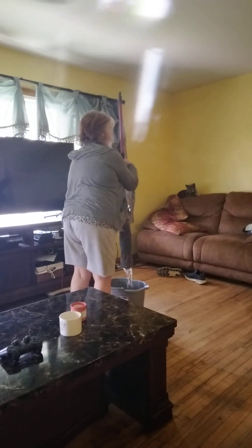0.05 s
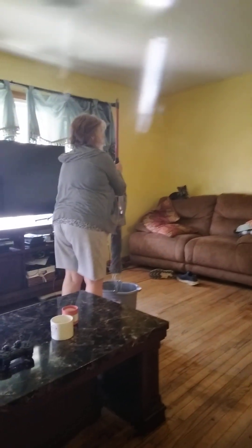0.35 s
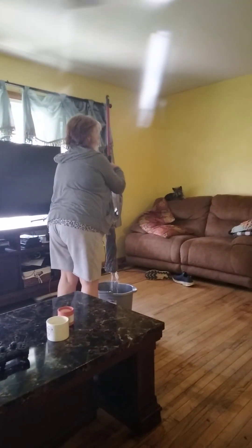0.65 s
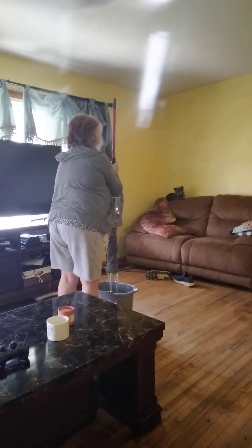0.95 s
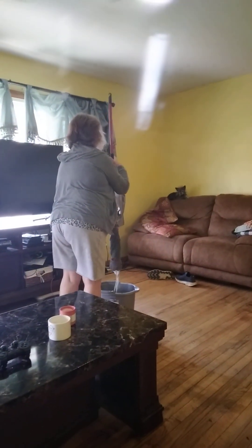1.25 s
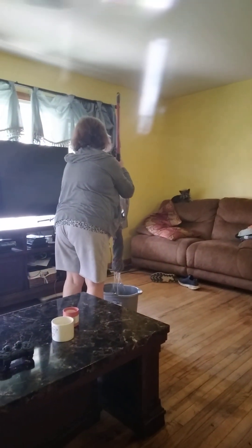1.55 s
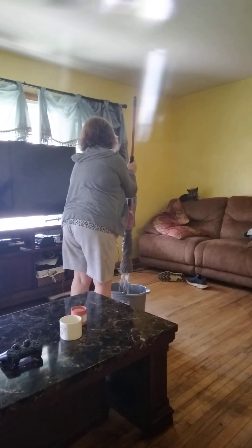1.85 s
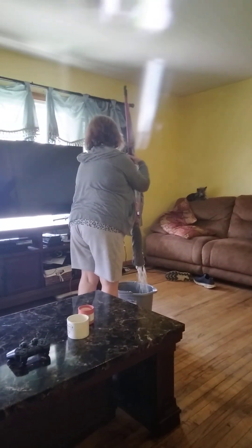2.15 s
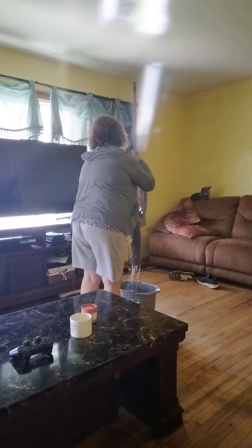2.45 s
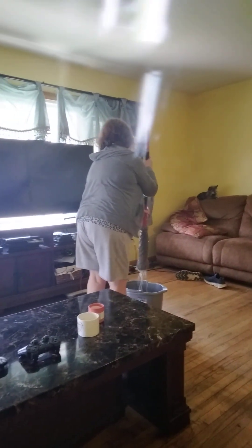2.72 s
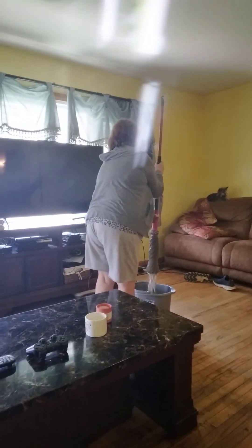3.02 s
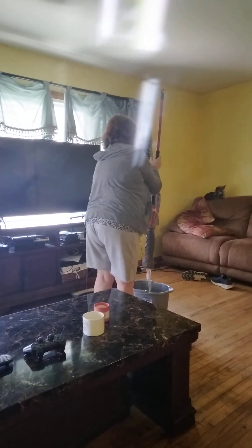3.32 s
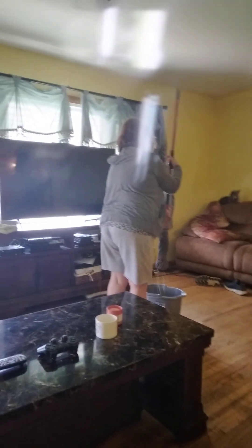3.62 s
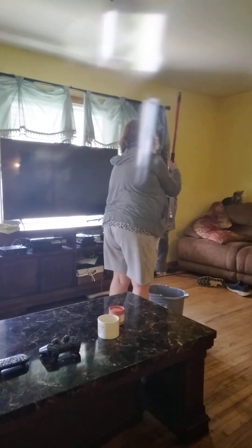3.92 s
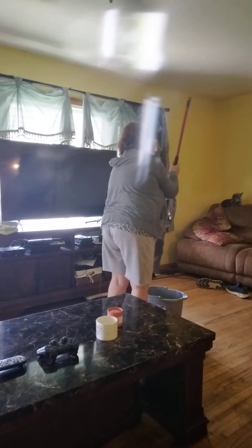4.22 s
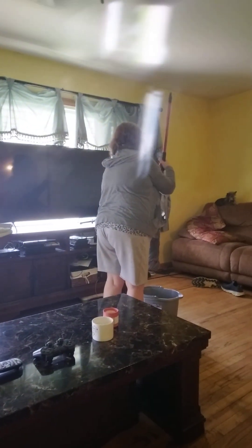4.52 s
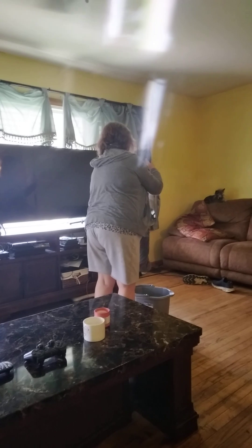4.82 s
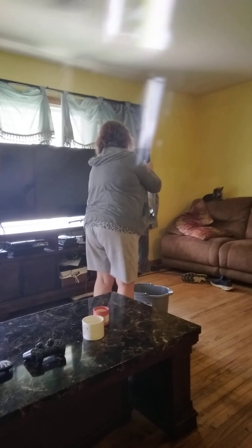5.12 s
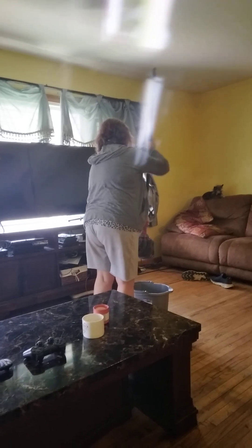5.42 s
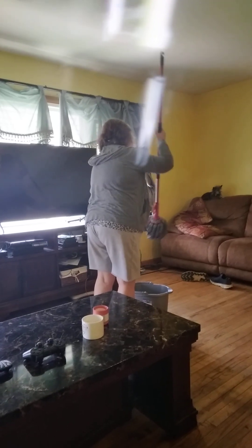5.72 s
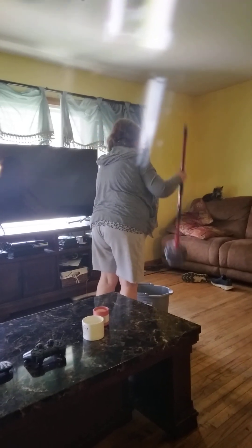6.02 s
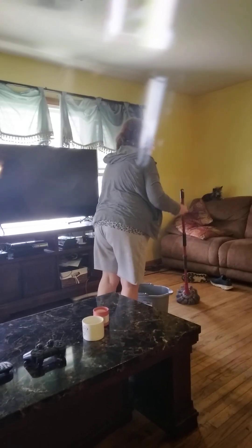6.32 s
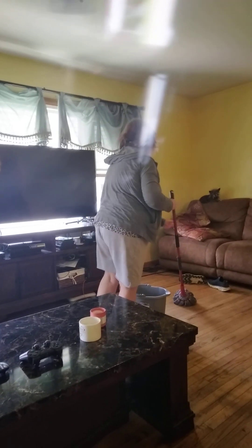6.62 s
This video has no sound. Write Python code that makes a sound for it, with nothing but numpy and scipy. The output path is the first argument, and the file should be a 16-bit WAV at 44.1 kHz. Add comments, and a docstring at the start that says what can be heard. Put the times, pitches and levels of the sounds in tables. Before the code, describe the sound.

A twist mop is wrung over a plastic bucket in a living room, heard from a few metres away with a short room echo. A low appliance hum and a soft rush of air continue throughout. The mop's ratchet turns in eight quick runs of clicks that blur into creaks, at about 0.3, 0.9, 1.6, 2.6, 3.5, 4.0, 4.4 and 4.8 seconds. From the start, water trickles and gushes into the bucket, splashing, drumming hollowly and making small plops. At around 3.8 seconds the flow thins to faint drips, so the last three twists sound nearly dry. The damp strings rustle softly at 5.3 seconds as the mop is lifted, and more faintly near 6 seconds. At about 6.3 seconds the wet head slaps down on the wooden floor, which gives a low thud, leaving the hum until about 7 seconds.

```python
"""A living room, where a twist mop is wrung over a plastic bucket a few metres away.
An appliance hums low throughout. The mop's ratchet clicks in eight quick runs that the room smears
into creaks, and water splashes, drums and plops into the bucket until only drips are left.
Then the damp strings rustle as the mop is lifted, and its head slaps down on the wooden floor,
which answers with a low thud."""
import sys
import numpy as np
from scipy import signal
from scipy.fft import rfft, irfft, next_fast_len
from scipy.io import wavfile
from scipy.ndimage import uniform_filter1d

SR = 44100
rng = np.random.default_rng(int(sys.argv[2]) if len(sys.argv) > 2 else 0)


def to_wav(s):
    """Save 16-bit WAV."""
    ch = np.atleast_2d(s).T  # columns
    pcm = np.round(np.clip(ch, -1, 1) * 32767)  # PCM
    wavfile.write(sys.argv[1], SR, pcm.astype(np.int16))


N = 302516
T = np.arange(N) / SR


def from_db(db):
    """Turn decibels into a gain to multiply by."""
    return 10 ** (np.asarray(db) / 20)


def rms_one(x):
    """Scale a signal to an average power of 1."""
    return x / np.sqrt(np.mean(x ** 2) + 1e-20)


def at_hz(points, hz):
    """Look up a frequency in a table, gliding between rows on a log scale."""
    f, value = np.transpose(points)
    return np.interp(np.log(np.maximum(hz, 1)), np.log(f), value)


def drift(rate):
    """A smooth random wobble that changes about rate times a second."""
    knots = rng.standard_normal(4096)
    zigzag = np.interp(T * rate, np.arange(len(knots)), knots)
    return rms_one(uniform_filter1d(zigzag, int(SR / rate / 2)))


def coloured(x, points, keep_power=True):
    """Give a sound the tone colour in a table, with no echo ahead of it (minimum phase)."""
    size = 4096
    cepstrum = irfft(np.log(from_db(at_hz(points, np.arange(size // 2 + 1) * SR / size))))
    cepstrum[1:size // 2] *= 2
    cepstrum[size // 2 + 1:] = 0
    pulse = irfft(np.exp(rfft(cepstrum)))
    if keep_power:
        pulse = pulse / np.linalg.norm(pulse)
    return signal.oaconvolve(x, pulse.reshape((1,) * (x.ndim - 1) + (-1,)), axes=-1)[..., :N]


def ring(clicks, hz, ring_s):
    """Each click starts a tone that fades by 60 dB in its ring time, ring_s."""
    decay = from_db(-60 / (ring_s * SR))
    step = 2 * np.pi * hz / SR
    return signal.lfilter([0, np.sin(step)], [1, -2 * decay * np.cos(step), decay ** 2], clicks + 1e-18)


def add(out, s, sound):
    """Mix a short sound in at time s."""
    i = max(0, round(s * SR))
    out[..., i:i + sound.shape[-1]] += sound[..., :N - i]


def grains(per_s, spread_db):
    """Tiny random taps of uneven size."""
    sizes = from_db(spread_db * np.minimum(rng.exponential(1, N), 4)) * rng.choice([-1, 1], N)
    return sizes * (rng.random(N) < per_s / SR)


def swell(s, attack_s, hold_s, fade_db_per_s):
    """A gain that rises from time s and starts to die away hold_s after s."""
    return np.clip((T - s) / attack_s, 0, 1) * from_db(-fade_db_per_s * np.maximum(T - s - hold_s, 0))


# The lasting tones of the hum: (pitch [Hz], level [dB], unsteadiness [0-1])
HUM_TONES = [(44.5, -50, 0.26), (92.3, -63.5, .7), (123, -59.5, 0.93), (136.3, -57.5, 1)]
# How two motor tones swell and fade: (time [s], lower tone's level [dB], upper tone's level [dB])
MOTOR_LEVELS = [(0, -51.5, -52.5), (.95, -44.5, -46), (1.85, -49.5, -51.5), (2.2, -57, -59),
                (3.3, -50, -52.5), (4.6, -58, -55), (5.0, -59.5, -82), (6.86, -54, -66)]
def appliance_hum(motor_hz, motor_gain_db, unsteady):
    """An appliance hums on a few low tones while two motor tones come and go."""
    hum = sum(from_db(db) * wavering_tone(hz, shake) for hz, db, shake in HUM_TONES)
    times, *curves = np.transpose(MOTOR_LEVELS)
    for hz, levels in zip(motor_hz, curves):
        hum += from_db(np.interp(T, times, levels) + motor_gain_db) * wavering_tone(hz, unsteady)
    return hum


def wavering_tone(hz, unsteady):
    """One tone of the hum, wandering in loudness and slightly in pitch."""
    wander = 1 + unsteady * (drift(11) + 1j * drift(11))
    return rms_one(np.real(wander * np.exp(2j * np.pi * (hz * T + rng.random()))))


# Tone colour of the room's soft rush: (frequency [Hz], level [dB])
AIR_COLOUR = [(30, -7), (45, -1.5), (70, 6), (125, 6.5), (170, -0.5), (400, -2), (800, -3.5), (1300, -8),
              (2200, -10.5), (4000, -17.5), (6300, -31), (10000, -32.5), (15000, -40)]
def room_air(level_db):
    """A soft, deep rush comes from all around."""
    noise = diffuse_noise(next_fast_len(N))[:, :N]
    return from_db(level_db) * rms_one(coloured(noise, AIR_COLOUR))


# Water the strings let go between twists: (start [s], length [s], splashing [dB], drumming [dB])
WATER_SPURTS = [(-.06, 0.027, -40.5, -59), (.66, 0.078, -45, -48.5), (1.28, 0.22, -54.5, -64),
                (2.1, 0.17, -43.5, -62), (3.02, 0.37, -43, -56), (3.32, 0.26, -45.5, -46)]
def water_flow(trickle_db=(-50.5, -54), dry_from_s=3.8, drying_db_per_s=90, drips_db=-19.5):
    """Two gains, splashing and drumming: a trickle thins to drips; each twist or spurt adds a gush."""
    drying_db = np.maximum(-drying_db_per_s * np.maximum(T - dry_from_s, 0), drips_db)
    power = np.outer(from_db(trickle_db), from_db(drying_db)) ** 2
    for s, length, *_, splash_db, drum_db in [*MOP_TWISTS, *WATER_SPURTS]:
        gush = swell(s, attack_s=0.035, hold_s=length, fade_db_per_s=88.5)
        power += np.outer(from_db([splash_db, drum_db]), gush) ** 2
    return np.sqrt(power)


# Tone colour of spattering water: (frequency [Hz], level [dB])
SPLASH_COLOUR = [(150, -33), (300, 5), (450, -6), (750, -4.5), (1100, -3.5), (1700, -4), (2300, -0.5),
                 (3300, -1), (4300, 0), (6000, -5.5), (8000, -7), (11000, -6), (13000, -10.5), (16000, -18)]
# Notes of the bucket with water in it: (pitch [Hz], level [dB], ring time [s])
BUCKET_NOTES = [(150.5, -7.5, 0.06), (276, -3.5, 0.067), (306.5, 3, 0.083), (382, 0.5, 0.043),
                (444, -3, 0.037), (740, -26.5, 0.036)]
def falling_water(drops_per_s, spread_db, ring_cycles, bubble_db, surge_db, bucket_db):
    """Drops crackle on the water, leave small ringing bubbles and drum on the bucket, in surges."""
    splash_gain, drum_gain = water_flow()
    drops = grains(drops_per_s, spread_db)
    pitches = np.geomspace(500, 9000, 28)   # Hz
    choice = rng.integers(0, 3 * len(pitches), N)   # one drop in three traps air
    bubbles = sum(hz * ring(drops * (choice == k), hz, ring_cycles / hz) for k, hz in enumerate(pitches))
    crackle = rms_one(drops) + from_db(bubble_db) * rms_one(bubbles)
    splash = rms_one(coloured(crackle, SPLASH_COLOUR))
    drum = rms_one(sum(from_db(db) * ring(drops, hz, ring_s) for hz, db, ring_s in BUCKET_NOTES))
    surges = from_db(surge_db * drift(21.715))
    return (splash * splash_gain + from_db(bucket_db) * drum * drum_gain) * surges


# Bigger lumps of water that trap a bubble: (time [s], level [dB], bubble pitch [Hz])
WATER_PLOPS = [(.005, -29, 2270), (.675, -25.5, 3330), (1.188, -30.5, 2140), (1.283, -27.5, 3400),
               (1.325, -28.5, 5140), (1.42, -34.5, 2340), (2.14, -33.5, 810), (2.206, -24.5, 1640),
               (2.225, -25.5, 2420), (2.26, -35.5, 740), (3.03, -23, 3640), (3.153, -22, 2350),
               (3.35, -41, 300), (3.49, -30, 555)]
def plops(ring_cycles, rise, splash_db, splash_s):
    """A lump of water splashes and traps a bubble, whose pitch rises as it floats up."""
    t, tones, splashes = T[:SR // 6], np.zeros(N), np.zeros(N)
    for s, db, hz in WATER_PLOPS:
        age = t * hz / ring_cycles   # 1 when the bubble has faded by 60 dB
        phase = 2 * np.pi * hz * t * (1 + rise * np.minimum(age, 2))
        add(tones, s, from_db(db - 60 * age) * np.sin(phase))
        add(splashes, s, from_db(db + splash_db) * rng.standard_normal(len(t)) * np.exp(-t / splash_s))
    return tones + coloured(splashes, SPLASH_COLOUR)


# Each twist of the mop's sleeve drags a catch over a run of teeth and squeezes out water:
# (start [s], length [s], teeth [count], speeding up [-1 to 1], first tooth [dB], middle tooth [dB],
#  last tooth [dB], first treble [dB], last treble [dB], hollow knock [dB], splashing [dB], drumming [dB])
MOP_TWISTS = [ (.314, 0.16, 8, 0, -14.5, -10.5, -22, -6, -2, 0.5, -58, -51),
              (0.899, 0.18, 8, -0.024, -17, -16, -19.5, -32, -7, -2, -41, -45),
              (1.644, 0.23, 7, 0.1, -15, -16, -11.5, -10, 2, -18, -35.5, -41.5),
              (2.625, 0.26, 6, -0.13, -12, -16.5, -20.5, 2.5, -5.5, -13, -38.5, -46),
              (3.484, 0.13, 8, .55, -18, -14, -17.5, 9, 14.5, 5, -46, -45),
              (3.953, .077, 5, .24, -12, -6.5, -9, 7.5, 0, -7.5, -59, -95),
              (4.375, 0.11, 7, -0.042, -13, -7.5, -16.5, 4, -4.5, -4, -70, -91),
              (4.840, .135, 7, -.1, -16.5, -13.5, -21, -1.5, -4, 7, -70, -74)]
# The catch slips one more tooth after a twist: (time [s], level [dB], treble [dB], hollow knock [dB])
CATCH_SLIPS = [(1.941, -12.5, -2, -9), (3.009, -27, 8.5, 11)]
def ratchet_teeth(jitter_s=0.002, scatter_db=1.0):
    """List every snap, laid out like CATCH_SLIPS; the hand turns a little unevenly."""
    snaps = list(CATCH_SLIPS)
    for s, length, count, speeding, first, middle, last, *trebles, knock, _, _ in MOP_TWISTS:
        turn = np.linspace(0, 1, count)
        late, harder = rng.standard_normal((2, count))
        times = s + length * turn * (1 + speeding * (1 - turn)) + jitter_s * late * (turn > 0)
        force = np.interp(turn, [0, .5, 1], [first, middle, last]) + scatter_db * harder
        treble = np.interp(turn, [0, 1], trebles)
        snaps += zip(times, force, treble, np.full(count, knock))
    return snaps


# Tone colour of a snap heard through the plastic sleeve: (frequency [Hz], level [dB])
SLEEVE_COLOUR = [(100, -21.5), (250, -19.5), (500, -13.5), (1000, -15.5), (1650, -9.5), (2100, -0.5),
                 (3200, -2), (4500, -2), (6000, -7.5), (7000, -9), (8000, -7.5), (11000, -6.5),
                 (13000, -14), (16000, -18.5)]
# Notes of the handle tube: (pitch [Hz], level [dB], ring time [s])
HANDLE_NOTES = [(1930, -39, 0.11), (2660, -55.5, .06), (3670, -58, .05), (6000, -46, 0.044),
                (8000, -37.5, 0.004), (11040, -47.5, 0.0067)]
def ratchet(gain_db, snap_s, rasp, treble_hz, knock_hz):
    """Each tooth snaps with a short rasp and sets the handle ringing."""
    t, snaps = T[:SR // 100], np.zeros((2, N))
    echoes = [room_echo() for _ in range(19)]   # the echo changes as the mop turns
    low_pass = signal.butter(1, treble_hz, fs=SR)
    hollow = signal.butter(1, [knock_hz / 2, knock_hz], "band", fs=SR)
    for k, (s, db, treble_db, knock_db) in enumerate(ratchet_teeth()):
        snap = rasp * rng.standard_normal(len(t)) * np.exp(-t / snap_s)
        snap[0] += 1   # the click itself
        snap *= from_db(db + gain_db) / np.linalg.norm(snap)
        dull = signal.lfilter(*low_pass, snap)
        knock = from_db(knock_db) * signal.lfilter(*hollow, snap)
        snap = dull + from_db(treble_db) * (snap - dull) + knock
        add(snaps, s, signal.fftconvolve(snap[None], echoes[k % len(echoes)], axes=-1))
    handle = sum(from_db(db) * ring(snaps, hz, ring_s) for hz, db, ring_s in HANDLE_NOTES)
    return coloured(snaps, SLEEVE_COLOUR) + handle


# Rubs of the damp mop: (start [s], level [dB])
MOP_RUBS = [(5.29, -57), (5.96, -62.5)]
def mop_rustle(strings, attack_s, fade_db_per_s):
    """Damp strings and sleeves rub as the mop is lifted and swung out."""
    gain = sum(from_db(db) * swell(s, attack_s, attack_s, fade_db_per_s) for s, db in MOP_RUBS)
    return gain * coloured(strings, SPLASH_COLOUR)


# Tone colour of wet strings hitting wood: (frequency [Hz], level [dB])
WET_SLAP_COLOUR = [(60, 8.5), (130, 3), (400, 6), (850, -1.5), (2300, 0), (5500, -3), (8000, -9.5),
                   (11000, -9), (13000, -13), (16000, -25)]
def mop_slap(strings, at_s, level_db):
    """The wet head lands, its strings touching down in quick succession."""
    landing = swell(at_s, attack_s=0.028, hold_s=0.032, fade_db_per_s=450)
    return from_db(level_db) * landing * coloured(strings, WET_SLAP_COLOUR)


# The head, then the handle, strikes the floor: (time [s], level [dB])
FLOOR_BLOWS = [(6.279, -24.5), (6.325, -24)]
# Notes of the floorboards: (pitch [Hz], level [dB], ring time [s])
FLOOR_NOTES = [(25.6, 1.5, 0.65), (44.5, 2.5, 0.28), (67, -14, .13), (138, -10, 0.39)]
def floor_thud(soft_hz):
    """Soft blows set the floorboards swinging."""
    blows = np.zeros(N)
    for s, db in FLOOR_BLOWS:
        add(blows, s, from_db([db]))
    blows = signal.sosfilt(signal.butter(2, soft_hz, fs=SR, output="sos"), blows + 1e-18)
    return sum(from_db(db) * ring(blows, hz, ring_s) for hz, db, ring_s in FLOOR_NOTES)


# How alike left and right are in the room: (frequency [Hz], likeness [0-1])
STEREO_LIKENESS = [(30, 0.098), (120, 0.95), (250, 0.81), (500, 0.61), (1000, 0), (3000, 0.0034),
                   (16000, 0)]
def diffuse_noise(size):
    """Stereo noise whose two sides are alike in the bass and unrelated in the treble."""
    mid, side = rfft(rng.standard_normal((2, size)))
    alike = at_hz(STEREO_LIKENESS, np.arange(len(mid)) * SR / size)
    return irfft(np.sqrt(1 + alike) * mid + np.sqrt(1 - alike) * side * [[1], [-1]], size)


# How long the room rings: (frequency [Hz], ring time [s])
ROOM_RING_TIMES = [(100, 0.42), (300, 0.28), (800, 0.78), (2500, 0.55), (5500, 0.63), (9000, 0.41),
                   (15000, 0.26)]
def room_echo(direct_db=-9, early_db=1, early_s=0.063, build_s=0.0014):
    """The room's answer to a click: direct sound, near reflections and a tail that dies band by band."""
    t = T[:2 ** 15]
    spectrum = rfft(diffuse_noise(len(t)))
    hz = np.arange(len(t) // 2 + 1) * SR / len(t)
    centres = np.geomspace(100, 16000, 8)
    tail = 0
    for centre, share in zip(centres, np.eye(len(centres))):
        band = irfft(spectrum * at_hz(np.c_[centres, share], hz), len(t))
        tail = tail + band * from_db(-60 * t / at_hz(ROOM_RING_TIMES, centre))
    tail *= (1 + from_db(early_db) * np.exp(-t / early_s)) * np.minimum(t / build_s, 1)
    tail /= np.sqrt(np.sum(tail ** 2) / 2)
    tail[[0, 1], [4, 0]] += from_db(direct_db)   # reaches the right side 4 samples sooner
    return tail


def in_room(x):
    """Give a sound its own stereo echo of the room."""
    return signal.oaconvolve(x[None], room_echo(), axes=-1)[:, :N]


def scene():
    """Mop and water echo through the room; hum, air and floor thud fill it evenly."""
    hum = appliance_hum(motor_hz=(69.8, 112.8), motor_gain_db=-1, unsteady=0.39)
    air = room_air(level_db=-51.5)
    water = falling_water(drops_per_s=2200, spread_db=5.5, ring_cycles=21,
                          bubble_db=-7, surge_db=2, bucket_db=-1)
    lumps = plops(ring_cycles=30, rise=0.0257, splash_db=-13.5, splash_s=0.0091)
    creaks = ratchet(gain_db=15.5, snap_s=0.0015, rasp=0.17, treble_hz=6860, knock_hz=1580)
    strings = rms_one(grains(per_s=5000, spread_db=5))   # tiny taps of wet strings
    rustle = mop_rustle(strings, attack_s=0.047, fade_db_per_s=46.5)
    slap = mop_slap(strings, at_s=6.245, level_db=-29)
    thud = floor_thud(soft_hz=150)
    return hum + air + in_room(water) + in_room(lumps) + creaks + in_room(rustle + slap) + thud


# Tone colour of the left and right microphone openings: (frequency [Hz], gain [dB])
LEFT_MIC = [(500, 1.5), (1200, 1.5), (2000, 3), (3200, 2.5), (6800, 3), (7900, 8.5), (9000, -6.5),
            (10500, -12), (12000, -19), (15000, -7.5)]
RIGHT_MIC = [(500, 1.5), (2000, 0), (3200, 1), (6000, -1.5), (7900, -5), (9400, -2.5), (10700, 3.5),
             (12000, -5.5), (15000, -9.5)]
def record(dry):
    """Each microphone opening has its own treble peak; sound above 16 kHz is cut."""
    sides = [coloured(x, mic, keep_power=False) for x, mic in zip(dry, (LEFT_MIC, RIGHT_MIC))]
    return signal.sosfilt(signal.ellip(10, .2, 80, 16000, fs=SR, output="sos"), np.array(sides))


dry = scene()
out = record(dry)
to_wav(out)
```